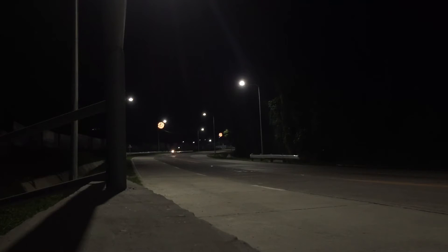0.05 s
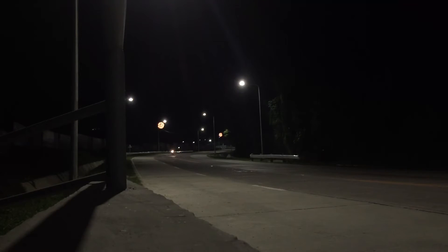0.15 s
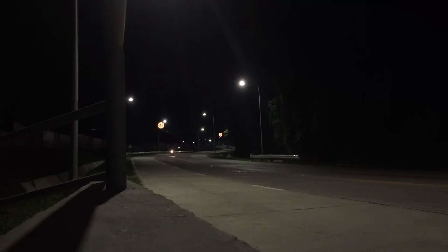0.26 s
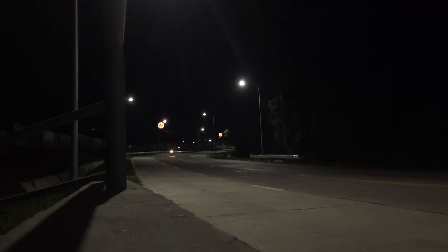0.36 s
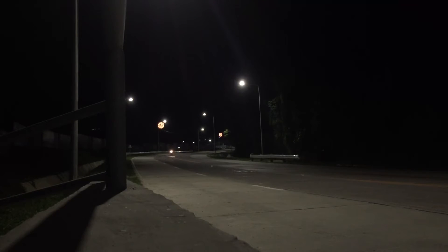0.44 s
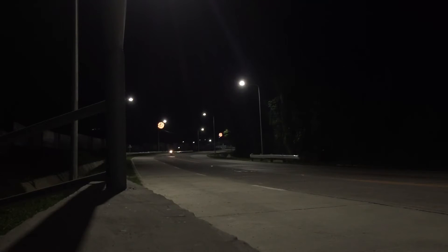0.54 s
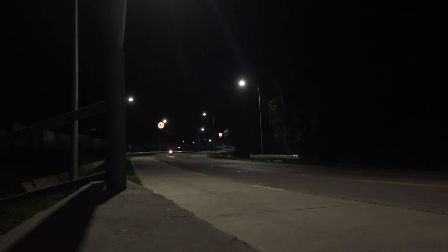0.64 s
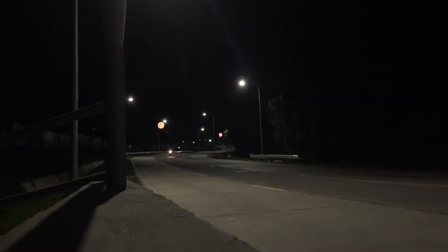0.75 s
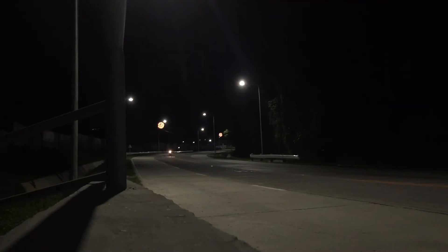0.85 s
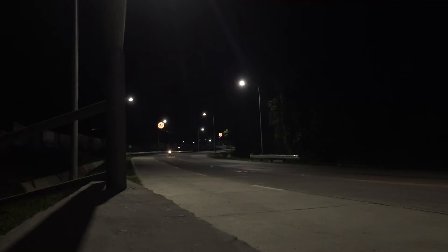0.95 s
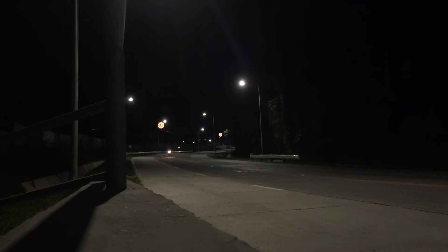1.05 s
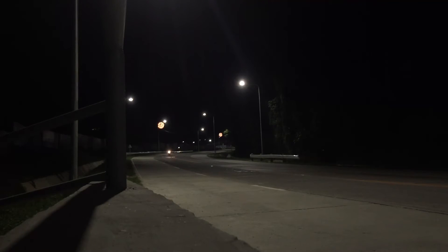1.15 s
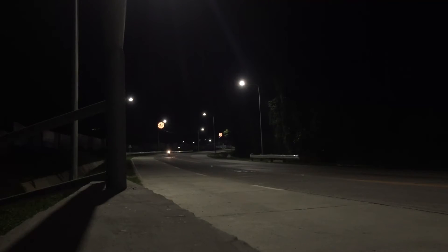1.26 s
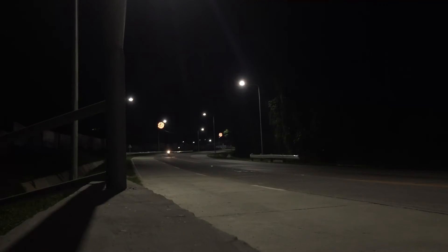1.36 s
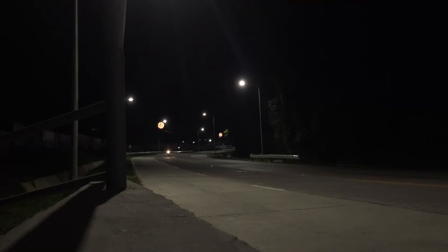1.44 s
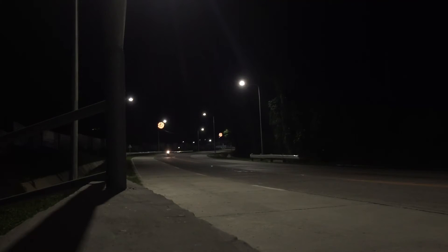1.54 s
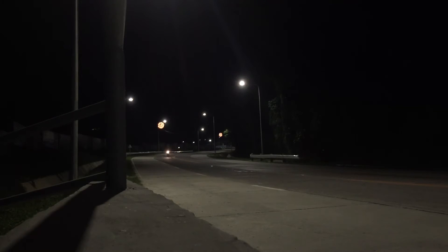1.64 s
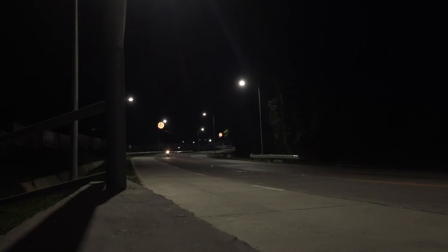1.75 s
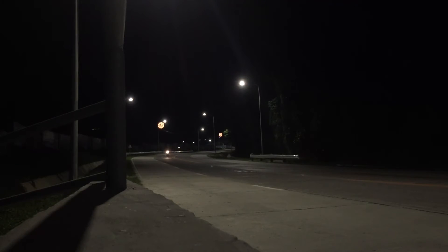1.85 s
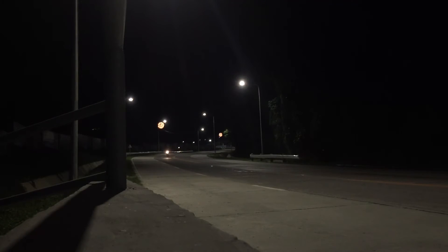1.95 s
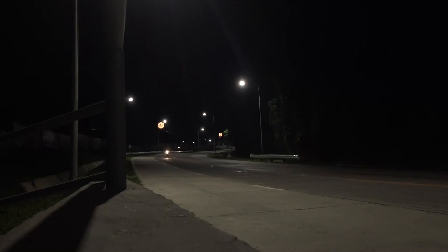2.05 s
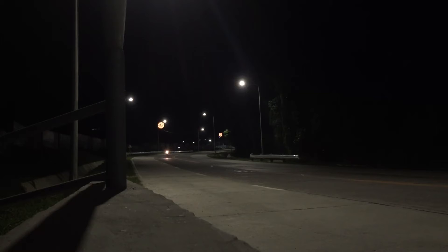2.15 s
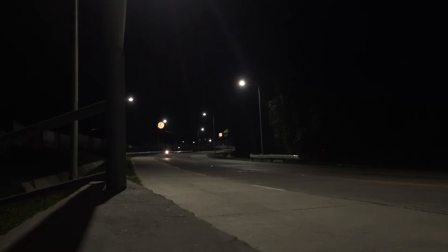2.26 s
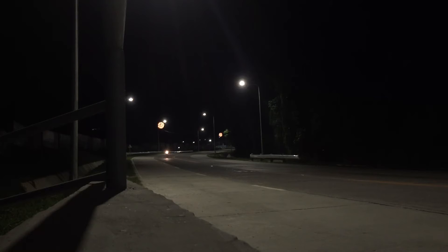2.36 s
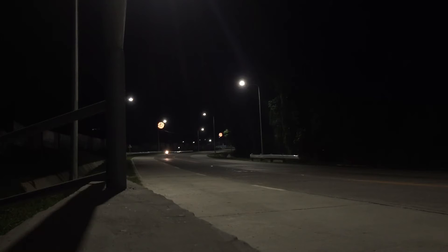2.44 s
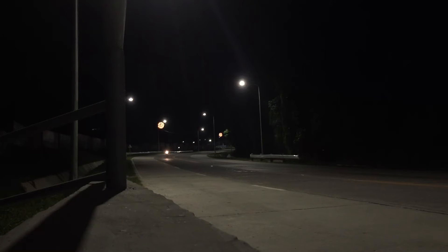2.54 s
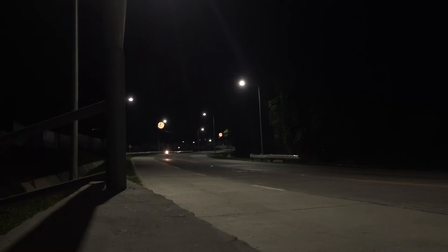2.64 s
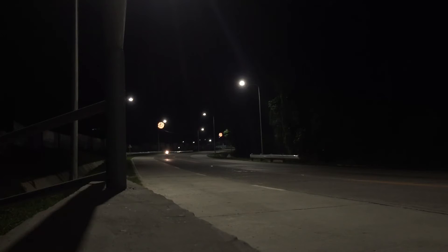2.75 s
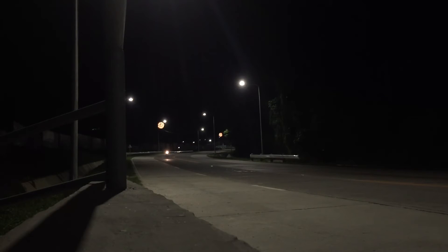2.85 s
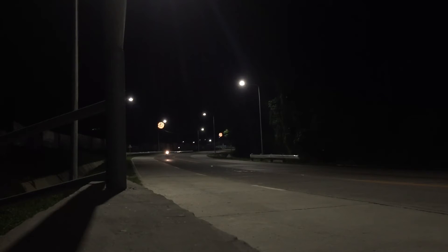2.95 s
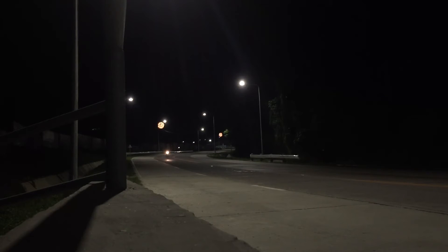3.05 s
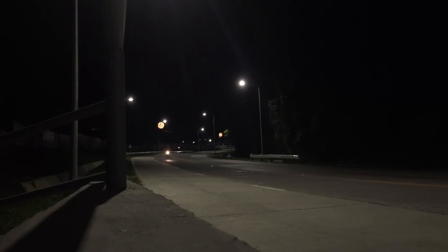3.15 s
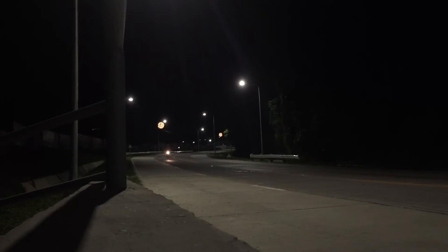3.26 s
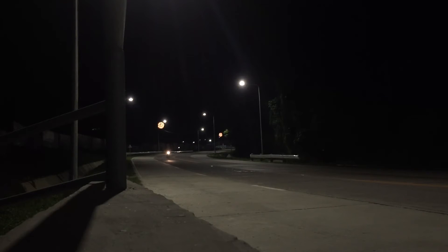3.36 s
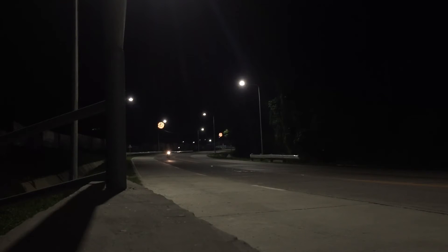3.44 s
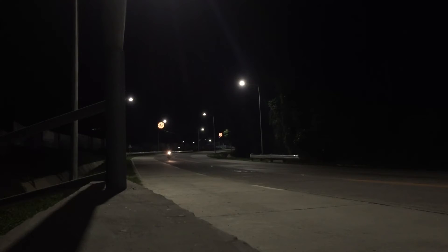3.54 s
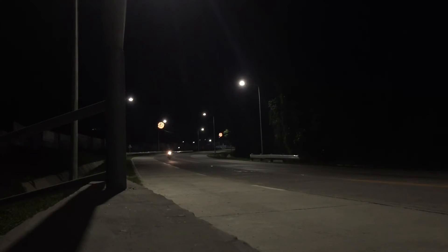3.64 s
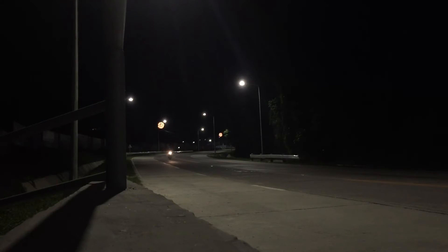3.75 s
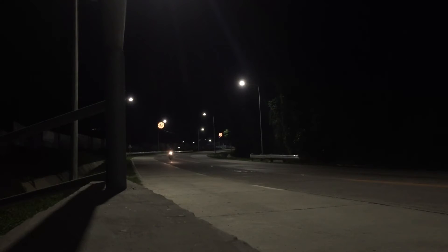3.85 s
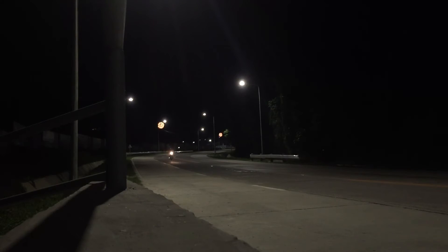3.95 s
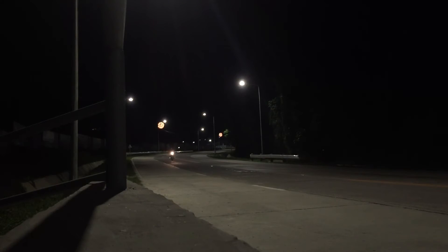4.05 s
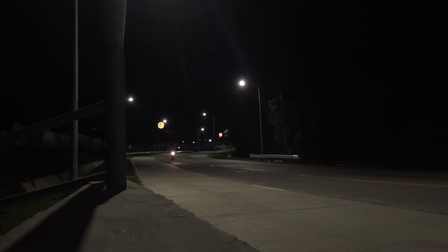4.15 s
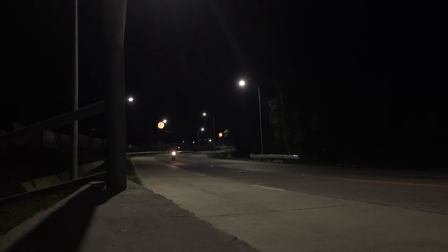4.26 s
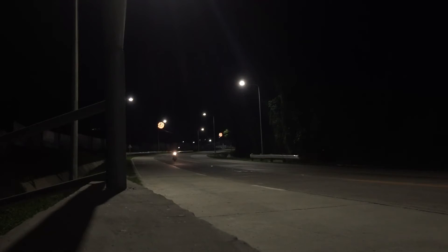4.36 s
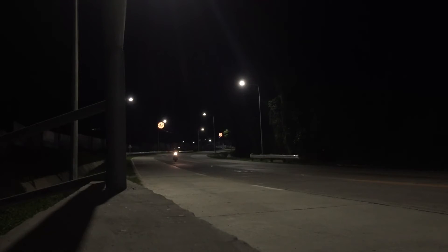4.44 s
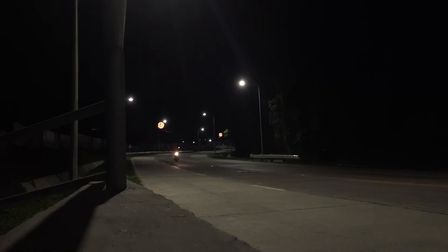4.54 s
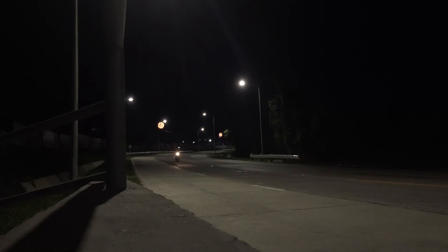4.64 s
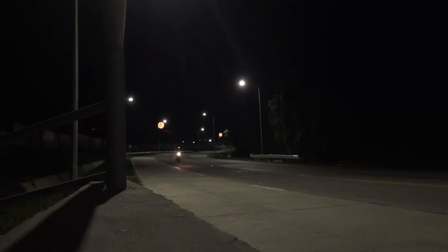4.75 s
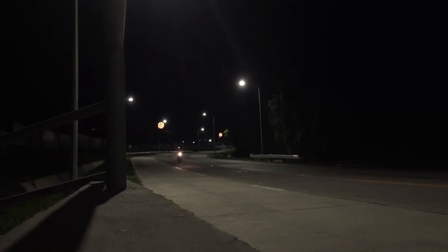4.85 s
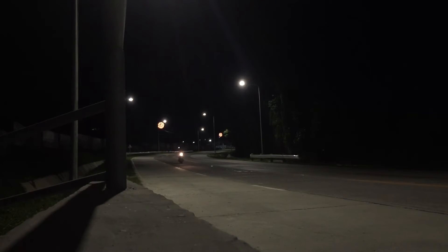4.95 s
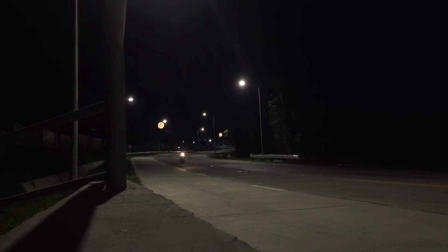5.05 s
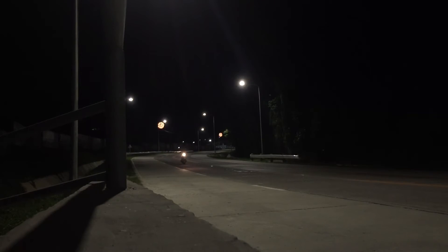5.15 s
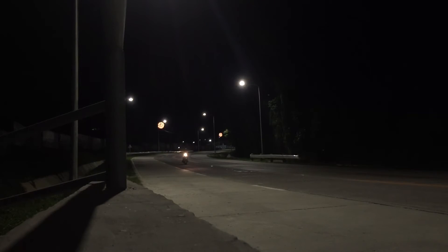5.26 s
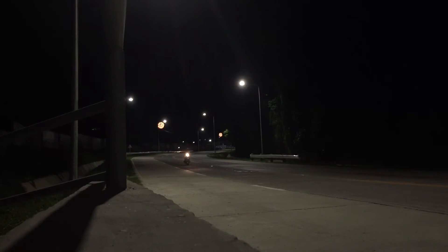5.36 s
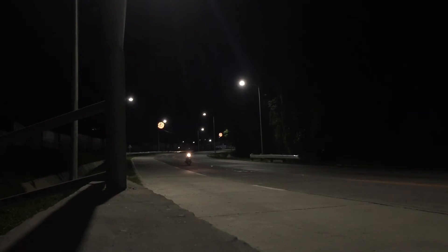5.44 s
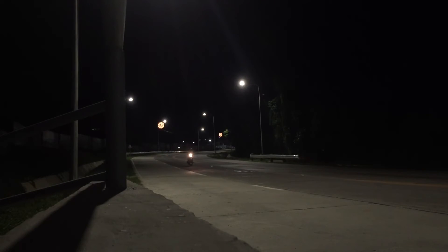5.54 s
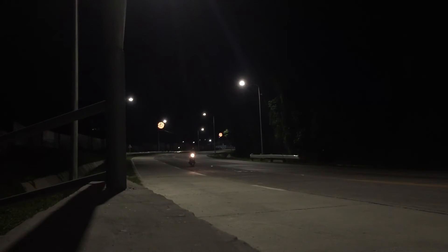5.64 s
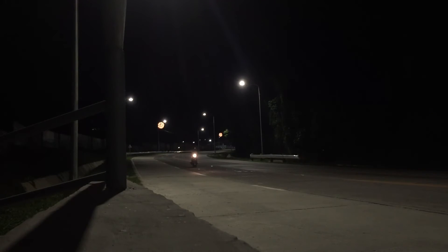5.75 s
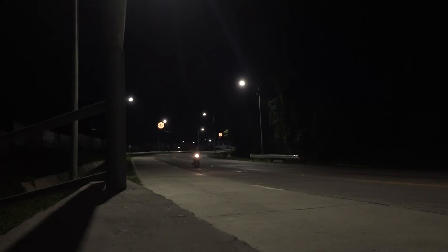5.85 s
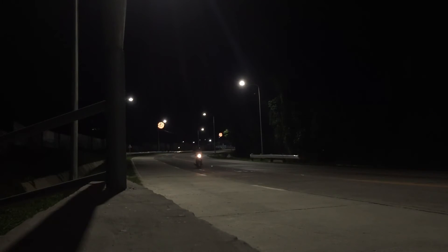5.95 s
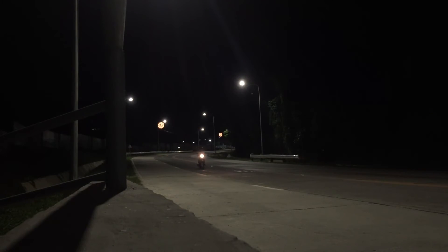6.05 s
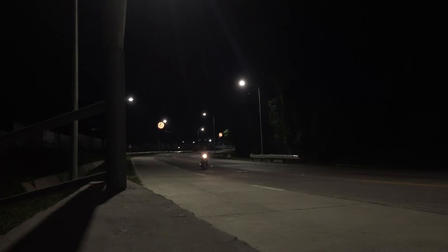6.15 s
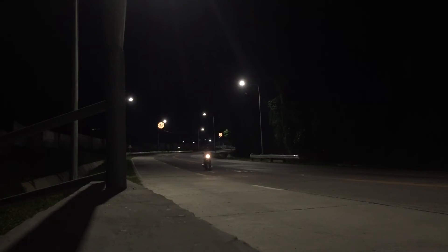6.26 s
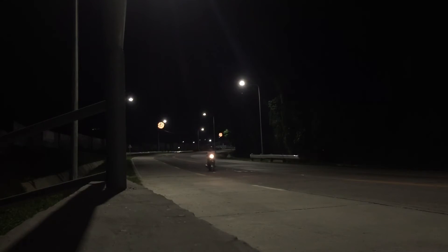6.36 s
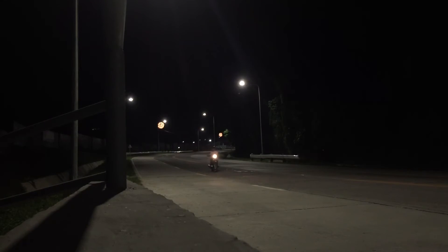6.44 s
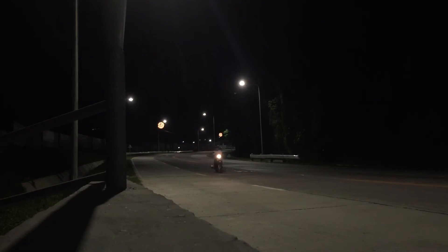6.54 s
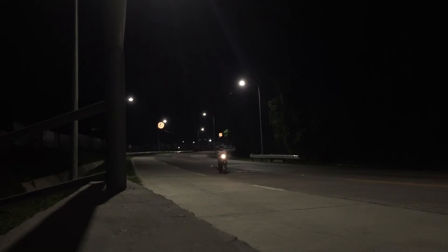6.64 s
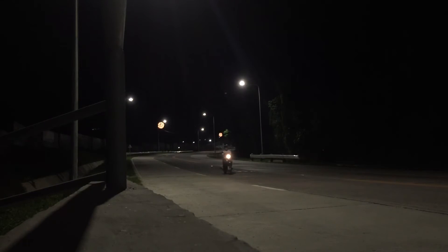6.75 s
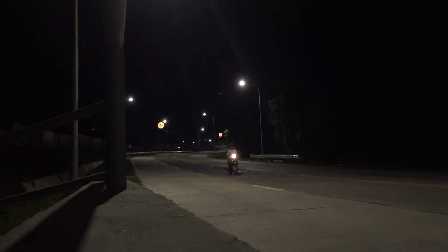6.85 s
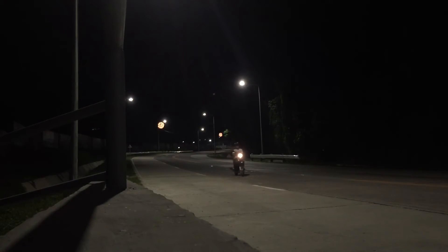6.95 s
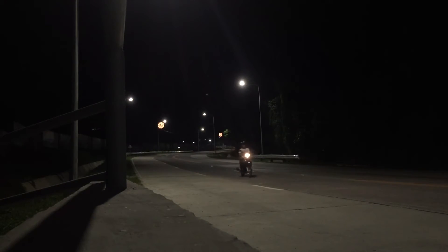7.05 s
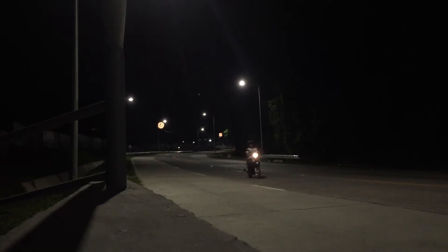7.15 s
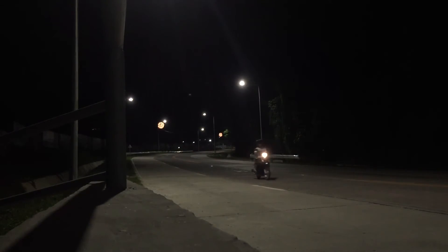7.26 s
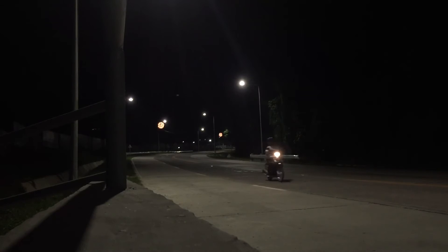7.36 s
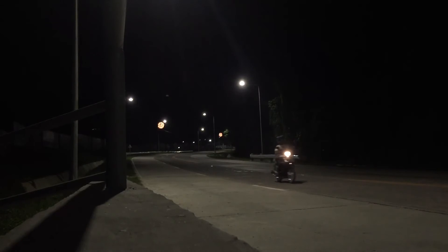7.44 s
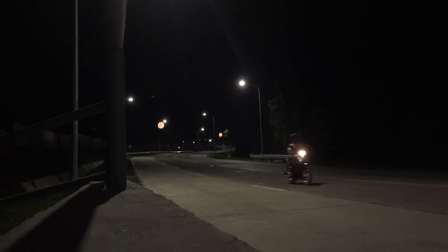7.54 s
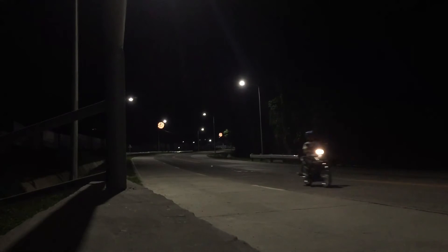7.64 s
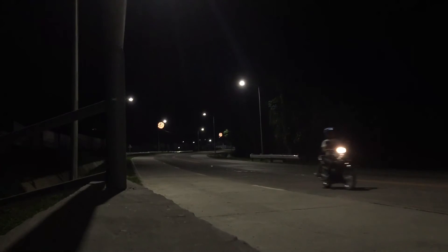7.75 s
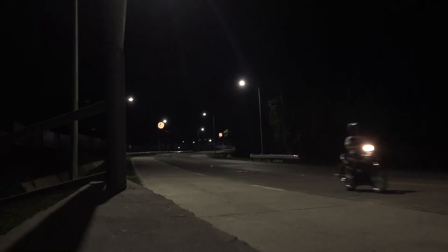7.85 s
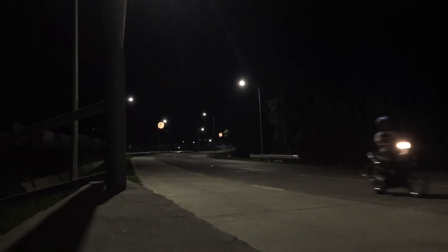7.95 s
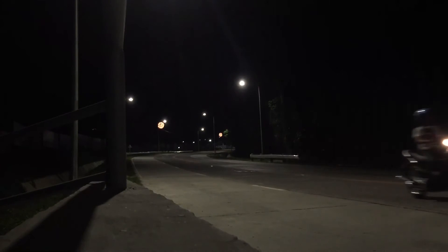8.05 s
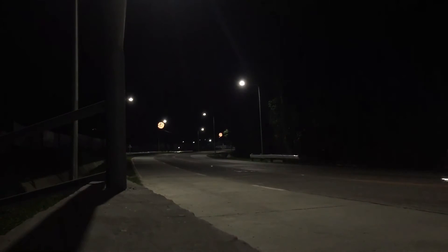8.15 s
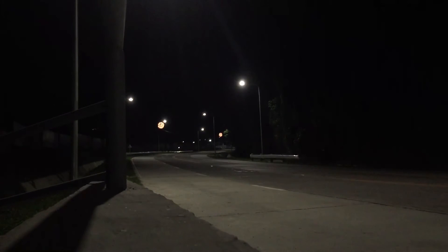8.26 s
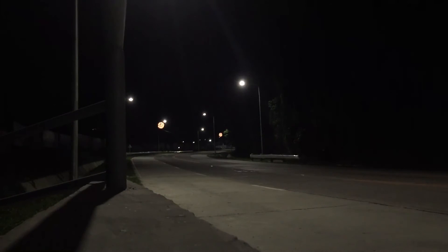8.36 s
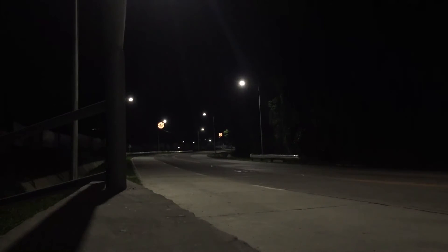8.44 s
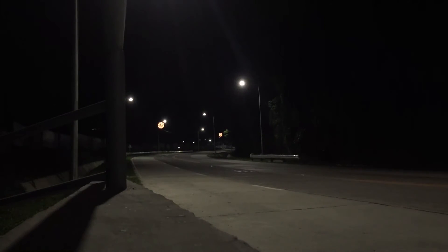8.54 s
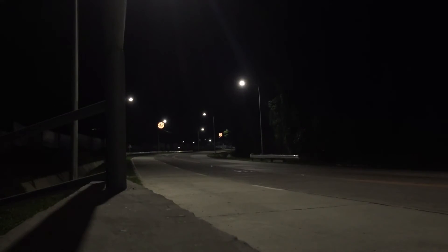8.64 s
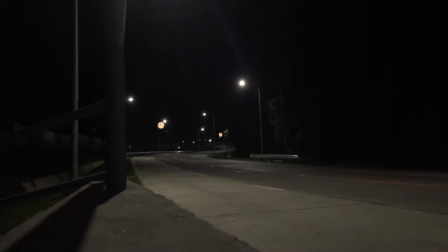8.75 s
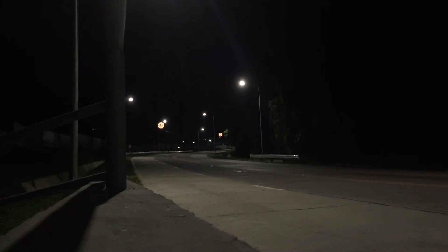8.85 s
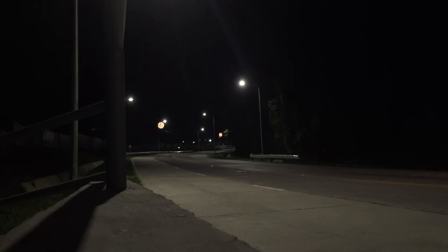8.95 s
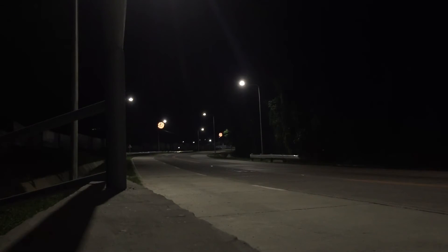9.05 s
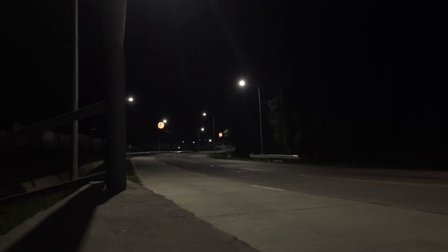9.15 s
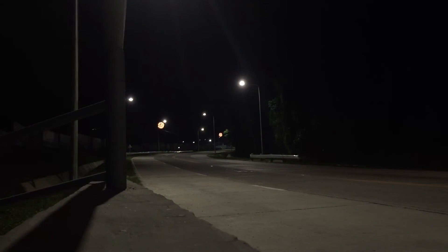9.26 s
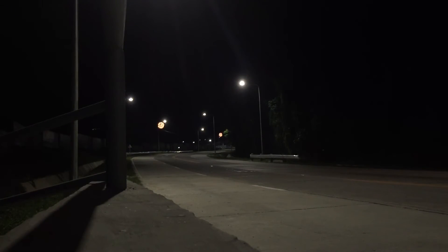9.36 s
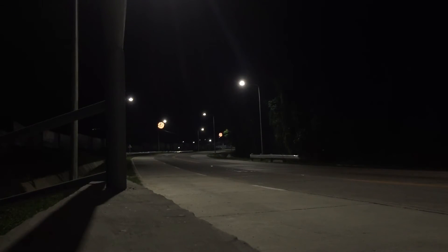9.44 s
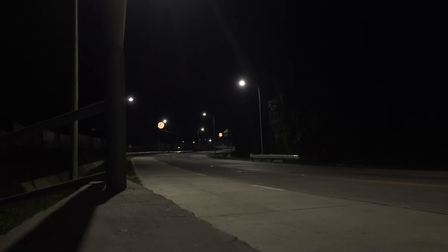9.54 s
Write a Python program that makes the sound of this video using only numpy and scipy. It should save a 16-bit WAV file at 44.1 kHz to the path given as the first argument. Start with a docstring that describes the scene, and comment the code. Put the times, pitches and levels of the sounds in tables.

```python
"""V-twin pass-by at night

A V-twin motorcycle with an open exhaust idles, pulls through two gears, coasts, opens up beside the listener
and shuts its throttle. Uneven firing pulses ring two pipes; shaped noise makes gas rasp, tyre roar and hiss.
Gear tones and resonances flare close by; echoes come off kerb, fence and trees.
Insects (scraped resonances), a frog (throbbing tone), ticks and a distant town's noise lie behind."""
import sys
import numpy as np
from scipy import signal
from scipy.fft import rfft, irfft
from scipy.io import wavfile
from scipy.ndimage import uniform_filter1d

SR = 44100
rng = np.random.default_rng(int(sys.argv[2]) if len(sys.argv) > 2 else 0)


def store_wav(level_fs):
    """Save 16-bit WAV to argv[1]."""
    pcm = np.round(np.clip(np.atleast_2d(level_fs), -1, 1) * 32767)
    wavfile.write(sys.argv[1], SR, pcm.T.astype(np.int16))


N = 423360
TIME = np.arange(N) / SR
PASS_S, PACE_M_PER_S, KERB_M = 8.6, 11.95, 6.65  # closest time, speed, closest distance
SOUND_M_PER_S = 343

# sharp front of a hard firing: [f/Hz, relative level/dB]
CRACK_COLOUR = [(100, -36.5), (300, -7.5), (480, -0.5), (650, -2.5), (820, 1), (1000, -17), (1250, -2.5),
                (1700, -24), (4000, -53)]
# gear whine, bent down during the pass: [t/s, f/Hz]
WHINE_HZ = [(4.2, 775), (5.3, 778), (6.5, 787), (8.1, 758), (8.4, 736.4), (8.7, 701), (9.1, 666.5)]


def amp(db):
    """Decibels to gain."""
    return 10 ** (np.asarray(db) / 20)


def unit(x):
    """Scales to rms 1."""
    return x / np.sqrt(np.mean(x ** 2) + 1e-20)


def curve(rows, axis=1):
    """One column of a time table, linear between rows, at every sample."""
    rows = np.asarray(rows)
    return np.interp(TIME, rows[:, 0], rows[:, axis])


def read(points, hz):
    """A spectrum table interpolated on a log-frequency axis."""
    f, value = np.transpose(points)
    return np.interp(np.log(hz + 1), np.log(f), value)


def noise(colour):
    """Gaussian noise of rms 1 with the given spectrum."""
    gain = amp(read(colour, np.fft.rfftfreq(N, 1 / SR)))
    return unit(irfft(rfft(rng.standard_normal(N)) * gain, N))


def drift(hz):
    """Slow random motion of rms 1: noise under a Gaussian low-pass."""
    gain = np.exp(-(np.fft.rfftfreq(N, 1 / SR) / hz) ** 2)
    return unit(irfft(rfft(rng.standard_normal(N)) * gain, N))


def resonate(x, hz, width_hz):
    """One-pole resonance of gain 1, fixed or moving: shift to 0 Hz, low-pass, shift back."""
    turn = np.exp(2j * np.pi * np.cumsum(hz * np.ones(len(x))) / SR)
    r = np.exp(-np.pi * width_hz / SR)
    return 2 * (turn * signal.lfilter([1 - r], [1, -r], x / turn + 1e-18)).real


def ring(x, colour, size=16384):
    """Passes x through a causal, minimum-phase body of energy 1 with the given spectrum."""
    log_gain = np.log(amp(read(colour, abs(np.fft.fftfreq(size, 1 / SR)))))
    response = np.fft.ifft(np.exp(np.conj(signal.hilbert(log_gain)))).real[:size // 2]
    return signal.oaconvolve(x, response / np.linalg.norm(response))[:N]


def clicks(turns):
    """One click at every whole turn."""
    return np.diff(np.floor(turns), prepend=np.floor(turns[0]))


def distance():
    """Metres from bike to listener on a straight ride at constant speed."""
    return np.hypot(KERB_M, PACE_M_PER_S * (TIME - PASS_S))


def behind():
    """0 on approach, then rising towards 1 as the pipe turns to face the listener."""
    return np.maximum(PACE_M_PER_S * (TIME - PASS_S) / distance(), 0)


def carried(fall):
    """Gain along the ride; fall: (closest/dB, loss per decade/dB, loss per metre/dB, gain from behind/dB)."""
    near_db, spread_db, air_db, behind_db = fall
    spread_loss_db = spread_db * np.log10(distance() / KERB_M)
    air_loss_db = air_db * (distance() - KERB_M)
    return amp(near_db - spread_loss_db - air_loss_db + behind_db * behind())


def grip():
    """Throttle 0-1: each twist opens, holds and snaps shut; the widest one counts."""
    # twists: [open t/s, shut t/s, opening 0-1, full-travel time/s]
    pull_rows = [(-.1, 1.9, .38, .05), (1.27, 2.92, .97, .7), (3.29, 4.96, .97, .13), (7.3, 7.95, .22, .45),
                 (7.89, 9.265, .95, .08)]
    shut_s, coast_throttle = 0.077, 0.018
    twists = []
    for start, end, opening, rise_s in pull_rows:
        ramp = np.minimum((TIME - start) / rise_s, 1 - (TIME - end) / shut_s)
        twists.append(opening * np.clip(ramp, 0, 1))
    return np.clip(np.maximum(np.max(twists, axis=0), coast_throttle), 0, 1)


def firings(turns, gap, rear_db, spread_db):
    """Two cylinders fire unevenly, short gap then long; each burn differs a little in strength."""
    front = clicks(turns)
    rear = amp(rear_db) * clicks(turns - gap)
    return np.array([front, rear]) * amp(spread_db * rng.standard_normal((2, N)))


def pipes(pulses, colour):
    """Each cylinder rings its own pipe."""
    hz, front_db, rear_db = np.transpose(colour)
    return ring(pulses[0], np.c_[hz, front_db]) + ring(pulses[1], np.c_[hz, rear_db])


def exhaust(drone_hz=314, drone_width_hz=26, drone_db=2, crackle_db=1.3, puff_s=0.0084, lug_db=3,
            burble_below=0.66, burble_slope_db=1.54):
    """Firings ring the pipes: deep boom when coasting, sharp bark and puffs of gas under load."""
    # engine: [t/s, cycles/s]; each cylinder fires once a cycle
    speed_rows = [(0, 17.4), (.53, 14.58), (.69, 15.28), (1.46, 15.59), (1.84, 18.09), (2.46, 24.37),
                  (2.94, 30.29), (3.3, 20.18), (3.9, 23.03), (4.99, 29.58), (5.08, 28.1), (5.24, 28.82),
                  (7.9, 20.68), (8.34, 21.64), (9.19, 24.84), (9.46, 22.75), (9.6, 25)]
    # rear against front cylinder, rows bark, boom, burble: [lag/cycles, level/dB]
    rear_rows = [(.374, 2), (.368, 3.9), (.356, 3.2)]
    # pulse, throttle open / shut / wheel driving engine: [f/Hz, front pipe level/dB, rear pipe level/dB]
    bark_colour, boom_colour, burble_colour = [(25.0, -94.0, -63), (44.8, -14, -27.5), (64.5, -8, -38.6),
                                               (82.4, 0.3, -3), (115.8, 3.5, 2.5), (145.7, -1.5, -4.5),
                                               (171, -2.5, -5.0), (200.0, -1, -2.5), (238, -14, -12),
                                               (273, -10, -10), (309.6, -14.9, -7.5), (378, -17.5, -20),
                                               (449, -25.5, -22.5), (556, -39, -33), (750.0, -50.0, -34.5),
                                               (1300.0, -50.5, -51.0), (4000.0, -81, -85.4)], [(25.2, -72.9, -63), (45.0, -29, -26.5),
                                                             (58.2, 0, -10.5), (69.9, 3.5, 7),
                                                             (84.2, 9, 0.4), (105.5, -6.5, -11.5),
                                                             (135.0, -7, -8.6), (166, -4.3, -11),
                                                             (216, -15, -15.5), (273, -36, -28.5),
                                                             (420.0, -41, -45.4), (650.0, -53, -51),
                                                             (1100.0, -75.9, -70), (4000.0, -89.6, -87)], [(40.0, -54, -61.0),
                                                                           (100.0, -22, -33.4),
                                                                           (172.0, 0.6, -14.7),
                                                                           (214, -3, -16.8), (247, -1, 2.5),
                                                                           (311, 10.8, 1.5),
                                                                           (364, 1.6, 0.3),
                                                                           (410.0, -13.1, -3.5),
                                                                           (470.0, -12, -4.5),
                                                                           (597, -15, -6),
                                                                           (780.0, -26, -13.5),
                                                                           (1000.0, -34.9, -30.2),
                                                                           (4000.0, -67.1, -61.7)]
    # turbulent gas leaving the pipe: [f/Hz, relative level/dB]
    rasp_colour = [(30, -46), (60, -11), (120, 9), (200, -5.5), (350, 0), (550, -10.5), (900, -12.5),
                   (1500, -20), (3000, -44), (8000, -56)]
    # level swells and dips: [t/s, 1/e half width/s, level/dB]
    swell_rows = [(.1, 0.28, 2.5), (2.75, 0.27, 1.5), (3.27, 0.044, -3), (5.731, 0.04, -2),
                  (6.05, 0.076, -2.5), (6.8, .12, -1.5), (7.3, .25, -1), (8.08, 0.018, -12)]
    # [closest/dB, loss per decade of distance/dB, loss per metre/dB, gain from behind/dB]
    bark_fall, boom_fall, burble_fall = (-18.5, -0.77, 0.1327, 0.9), (-16.5, 10, 0.0255, 0.5), (-32.5, -.9, 0.14, -4)
    rasp_fall, crack_fall = (-34, 5, 0.06, 2.5), (-49, 0.5, 0.1, -4)

    speed, throttle = curve(speed_rows), grip()
    start_turn, wobble_turns, coast_rasp = .19, .0008, .2
    spread_db = .2 + .35 * throttle
    turns = start_turn + np.cumsum(speed) / SR + wobble_turns * drift(30)
    # weaker per pulse at higher revs
    pulses, thuds, gulps = [firings(turns, gap, rear_db, spread_db) * np.sqrt(SR / speed / 2)
                            for gap, rear_db in rear_rows]
    bark = -pipes(pulses * np.sin(throttle * np.pi / 2), bark_colour)
    boom = pipes(thuds * (1 - throttle), boom_colour)
    # throttle nearly shut: burble, fading as revs sink
    overrun = np.clip(1 - throttle / burble_below, 0, 1) * amp(burble_slope_db * (speed - 28.5))
    burble = pipes(gulps * overrun, burble_colour)
    # high revs: a pipe mode sings out
    revving = np.clip((speed - 25.5) / 2, 0, 1)
    drone = amp(drone_db) * resonate(bark * revving, drone_hz, drone_width_hz)
    # wide throttle at low revs puffs hardest
    lugging = throttle ** 2 * np.clip((25 - speed) / 4, 0, 1)
    both = pulses.sum(0)
    puffs = unit(signal.lfilter([1], [1, -np.exp(-1 / (puff_s * SR))], both))
    gas = (coast_rasp + throttle ** 2) * amp(lug_db * lugging) * puffs * rng.standard_normal(N)
    rasp = ring(gas, rasp_colour)
    # sharp fronts of varying strength under load, most at low revs
    hardness = throttle ** 3 * np.clip((28 - speed) / 5, .3, 1)
    scatter = amp(crackle_db * np.clip(rng.standard_normal(N), -2, 2))
    crackle = ring(both * hardness * scatter, CRACK_COLOUR)
    swells = amp(sum(db * np.exp(-((TIME - s) / width_s) ** 2) for s, width_s, db in swell_rows))
    tonal = carried(bark_fall) * (bark + drone) + carried(boom_fall) * boom + carried(burble_fall) * burble
    return swells * (tonal + carried(rasp_fall) * rasp + carried(crack_fall) * crackle)


def pops():
    """Late burns of unburnt fuel thud in the pipe at low speed: short decaying sines."""
    # [t/s, envelope peak/dB, f/Hz, ring time/s]
    pop_rows = [(.343, -14, 79.7, 0.011), (0.434, -21, 71.4, 0.0064), (0.508, -28, 52, 0.036),
                (0.57, -20, 85.5, 0.0039), (1.241, -35, 46, 0.032)]
    out = np.zeros(N)
    for s, db, hz, ring_s in pop_rows:
        age = np.maximum(TIME - s, 0)
        envelope = age / ring_s * np.exp(1 - age / ring_s)
        out += amp(db) * envelope * np.sin(2 * np.pi * hz * age)
    return out


def cracks():
    """Single hard burns, at gear changes and as the throttle bites: impulses through the crack body."""
    # [t/s, strength/dB]
    crack_rows = [(3.118, -27), (3.296, -17), (3.459, -14), (3.507, -24), (3.555, -14.5), (3.619, -23),
                  (3.664, -13), (3.799, -15), (4.016, -17), (4.141, -24), (5.768, -12), (8.171, -2),
                  (8.801, -5), (9.477, -11)]
    kicks = np.zeros(N)
    for s, db in crack_rows:
        kicks[round(s * SR)] = amp(db)
    return ring(kicks, CRACK_COLOUR)


def gears(reach_s=0.79, waver=0.0048):
    """One gear whines, later with a lower partner; others join close by, and all bend in pitch together."""
    # gear and chain tones heard close by: [multiple of the whine, mean level/dB]
    gear_rows = [(1.11, -5), (1.48, -6), (1.61, -2.5), (1.83, -5)]
    turns = np.cumsum(curve(WHINE_HZ) * (1 + waver * drift(26.5))) / SR
    main = amp(2 * drift(6.5)) * np.sin(2 * np.pi * turns)
    joining = np.clip((TIME - 5.8) / 0.73, 0, 1)
    partner = amp(-5.5 + 3 * drift(2.7)) * joining * np.sin(2 * np.pi * .945 * turns)
    others = sum(amp(db + 2.6 * drift(4)) * np.sin(2 * np.pi * multiple * turns)
                 for multiple, db in gear_rows)
    close = np.exp(-((TIME - PASS_S) / reach_s) ** 2)
    return main + partner + close * others


def rolling(hiss_db=8.0, height_product_m2=0.462, bounce=0.15, flutter_db=1.36, load_db=-0.5):
    """Tyre, chain and gear sound; a road reflection sweeps a comb through the noise during the pass."""
    # tyre roar, chain hiss, valve gear and chain: [f/Hz, relative level/dB]
    roar_colour, hiss_colour, rattle_colour = [(40, 0.5), (200, 4.5), (550, -3), (800, -2.5), (1200, 0),
                                               (2200, -4.5), (3000, -9.5), (4000, -13.5), (5000, -19.5),
                                               (7500, -28), (15000, -40)], [(800, -8), (2300, 7), (3500, -5),
                                                                    (6000, 15), (7500, 6.5), (10000, 5),
                                                                    (13000, 1.5), (16000, 2)], [(800, -13),
                                                                                         (1800, 2.5),
                                                                                         (2600, -6),
                                                                                         (3800, -5.5),
                                                                                         (5000, -14.5),
                                                                                         (8000, -25),
                                                                                         (15000, -40)]
    # treble during the pass: [t/s, level before hiss_db/dB]
    hiss_rows = [(5.5, -90), (7.4, -95), (7.7, -64), (8.1, -61.5), (8.7, -49.5), (8.95, -63.5), (9.25, -70),
                 (9.6, -65)]
    # [closest/dB, loss per decade of distance/dB, loss per metre/dB, gain from behind/dB]
    roar_fall, rattle_fall, whine_fall = (-32.5, 8.5, 0.25, -5), (-43.5, 0, 0.6, -5.5), (-43.5, 3.5, 0.3, -4.5)

    rush = carried(roar_fall) * amp(flutter_db * drift(60)) * noise(roar_colour)
    rush += carried(rattle_fall) * amp(load_db * grip() + flutter_db * drift(70)) * noise(rattle_colour)
    near = np.clip((TIME - 5.5) / 2, 0, 1)
    rush += near * amp(curve(hiss_rows) + hiss_db + flutter_db * drift(90)) * noise(hiss_colour)
    bounce_delay_s = 2 * height_product_m2 / distance() / SOUND_M_PER_S
    rush += bounce * np.interp(TIME - bounce_delay_s, TIME, rush)
    emerging = np.clip((TIME - 3.8) / 0.72, 0, 1)
    return rush + emerging * carried(whine_fall) * gears()


def flares():
    """Running-gear resonances, and a brief rush near 2.3 kHz at 7.7 s, swell and fade as the bike turns past,
    bent by the root of the whine's ratio."""
    # [peak t/s, 1/e half width/s, f at unit bend/Hz, width/Hz, level before fading/dB]
    flare_rows = [(7.68, .09, 2330, 700, -40), (8.0, .17, 2180, 500, -40.5), (7.95, .2, 1350, 500, -44),
                  (8.55, .2, 2160, 330, -38), (8.52, .15, 4150, 700, -48), (8.55, .15, 1210, 260, -42.5),
                  (8.95, .18, 3400, 220, -52), (9.15, .3, 1250, 340, -42.5), (9.6, .12, 3800, 1500, -49)]
    bend = curve(WHINE_HZ) / np.interp(PASS_S, TIME, curve(WHINE_HZ))
    out = np.zeros(N)
    for s, half_s, hz, width_hz, db in flare_rows:
        near = abs(TIME - s) < 2.5 * half_s
        bent_hz = hz * np.sqrt(bend[near])
        tone = rng.standard_normal(N)[near]
        for _ in range(2):
            tone = resonate(tone, bent_hz, width_hz)
        out[near] += amp(db) * unit(tone) * np.exp(-((TIME[near] - s) / half_s) ** 2)
    return out


def early(x):
    """Near reflections off kerb, rail and fence fill the gaps between firings."""
    # [delay/s, level/dB]
    early_rows = [(.0078, -16.5), (0.0132, -18.5), (0.0245, -18)]
    return sum(amp(db) * np.interp(TIME - delay_s, TIME, x) for delay_s, db in early_rows)


def fence(x, setback_m=2.6, reach_m=10):
    """Echo from a fence behind the listener: its delay grows and shrinks, sweeping a comb through x."""
    bounce_db = -18
    along_m = PACE_M_PER_S * (TIME - PASS_S)
    delay_s = (np.hypot(KERB_M + 2 * setback_m, along_m) - distance()) / SOUND_M_PER_S
    return amp(bounce_db) * np.exp(-(along_m / reach_m) ** 2) * np.interp(TIME - delay_s, TIME, x)


def street(x):
    """Scattered echoes from trees and fences: sparse random taps, treble decaying fastest."""
    # reverberation: [f/Hz, t60/s]
    decay_rows = [(60, 1), (300, 0.75), (2000, 0.19), (8000, 0.1)]
    taps = rng.standard_normal(SR) * (rng.random(SR) < 2000 / SR) * (TIME[:SR] > .02)
    hz, t, z = signal.stft(taps, SR, nperseg=512)
    decay = amp(-60 * t / read(decay_rows, hz)[:, None])
    tail = signal.istft(z * decay, SR, nperseg=512)[1]
    return signal.oaconvolve(x, tail / np.linalg.norm(tail))[:N]


def insects():
    """Wing strokes scrape a narrow resonance, in chirps."""
    # [start t/s, end t/s, f/Hz, width/Hz, level/dB, chirps/s, chirp t/s, chirp depth 0-1,
    #  wing strokes/s, noisiness 0-1]
    insect_rows = [(0, 9.6, 5860, 820, -56.5, 3.435, 0.0017, 0.37, 70, 1),
                   (0, 11, 8450, 640, -71.5, 6.9, 0.064, 0.37, 110, 0.4),
                   (3.599, 7.4, 8460, 290, -71, 9.9, 0.056, 0.6, 110, 0.35),
                   (0, 2.64, 7740, 900, -72.5, 8.4, 0.032, 0.4, 90, 1),
                   (0, 8.8, 9920, 1100, -73.5, 0.5, 1.5, 0, 160, 0.4),
                   (0, 8.1, 11150, 1300, -73, 0.13, 0.46, 0.44, 158, 0.4),
                   (.65, 1.75, 4040, 700, -72.5, 1.2, 1, .3, 60, .9),
                   (2.45, 3.85, 3960, 1100, -68.5, 1, 2.83, .4, 60, .9),
                   (0.5, 3.2, 3110, 390, -69.5, 5.5, 0.904, 0.47, 60, 0.8)]
    out = np.zeros(N)
    for start, end, hz, width_hz, db, chirp_hz, chirp_s, depth, stroke_hz, noisy in insect_rows:
        turns = np.cumsum(stroke_hz * (1 + 0.00087 * drift(4.4))) / SR
        scrape = unit(rng.standard_normal(N) * (1 + (1 - noisy) * np.cos(2 * np.pi * turns)))
        song = (1 - noisy) * unit(clicks(turns)) + noisy * scrape
        for _ in range(4):
            song = resonate(song, hz, width_hz)
        chirp_phase = 2 * np.pi * chirp_hz * (TIME - chirp_s) + 0.067 * drift(1.8)
        chirps = 1 + depth * np.tanh(2 * np.cos(chirp_phase))
        out += amp(db) * unit(song * chirps) * ((TIME >= start) & (TIME < end))
    return out


def frog(hz=2470, throb_hz=18, fade_s=0.019):
    """Short throbbing trills on one clear, slightly hoarse note."""
    # [t/s, length/s, level before trim/dB]
    trill_rows = [(0.228, 0.35, -54.5), (1.288, 0.29, -54), (2.335, 0.38, -57.5), (3.522, 0.42, -56.5),
                  (4.68, 0.33, -55), (5.848, 0.41, -54.5)]
    waver, hoarse, trim_db = .011, .55, -0.5
    tone = np.sin(2 * np.pi * np.cumsum(hz * (1 + waver * drift(69.6))) / SR)
    voice = unit((1 + hoarse * drift(110)) * tone)
    throb = 1 + 0.52 * np.cos(2 * np.pi * throb_hz * TIME + 1.1 * drift(11.0))
    calls = sum(amp(db) * np.clip(np.minimum(TIME - s, s + length_s - TIME) / fade_s, 0, 1)
                for s, length_s, db in trill_rows)
    return amp(trim_db) * voice * throb * calls


def ticks(ring_s=0.0029, width_hz=380, trim_db=-0.5):
    """Brief dry ticks from the verge, each a burst of noise in one resonance."""
    # [t/s, level before trim/dB, f/Hz]
    tick_rows = [(.056, -44, 2150), (0.102, -44.5, 1690), (.29, -48, 1890), (.46, -41, 1710),
                 (.883, -45, 1810), (0.89, -52, 2930), (1.405, -38, 1900), (1.505, -50, 3100),
                 (1.605, -55.5, 5450), (1.72, -53, 5450), (2.559, -57, 2720), (2.581, -44.5, 1960),
                 (3.1, -44, 2200), (3.378, -40, 1820), (5.304, -54, 5430)]
    out, age = np.zeros(N), np.arange(2048) / SR
    envelope = age / ring_s * np.exp(1 - age / ring_s)
    for s, db, hz in tick_rows:
        burst = rng.standard_normal(len(age))
        for _ in range(2):
            burst = resonate(burst, hz, width_hz)
        out[round(s * SR):][:len(age)] += amp(db + trim_db) * unit(burst) * envelope
    return out


def patchy(x):
    """Makes a noise uneven: patches some 500 Hz wide and 70 ms long swell and sink."""
    depth_db = 3
    z = signal.stft(x, nperseg=512)[2]
    patches = uniform_filter1d(rng.standard_normal(z.shape), size=6, axis=0)
    patches = unit(uniform_filter1d(patches, size=12, axis=1))
    return unit(signal.istft(z * amp(depth_db * patches), nperseg=512)[1][:N])


def town(level_db=-50):
    """Distant town: steady coloured noise made patchy."""
    # [f/Hz, relative level/dB]
    night_colour = [(20, -3), (60, -18), (200, 8.5), (500, 6), (1000, 4), (2000, 2), (3000, -11.5),
                    (4000, -18), (4800, -21), (7000, -21.5), (12500, -19), (15500, -35)]
    return amp(level_db) * patchy(noise(night_colour))


def scene():
    """The bike, its echoes (trees and fences scatter little bass) and the night around it."""
    echo_db, echo_low_hz = -16.5, 170
    pipe = exhaust() + pops() + cracks()
    bike = pipe + early(pipe) + fence(pipe) + rolling() + flares()
    high_pass = signal.butter(2, echo_low_hz, "high", fs=SR, output="sos")
    echoes = signal.sosfilt(high_pass, street(bike))
    night = insects() + frog() + ticks() + town()
    return (bike + amp(echo_db) * echoes + night)[None]


def record(dry):
    """Upper band limit of the recorder: linear-phase low-pass."""
    edge_hz = 15700
    low_pass = signal.firwin(511, edge_hz, window=("kaiser", 9), fs=SR)
    return signal.oaconvolve(dry, low_pass[None], "same")


dry = scene()
out = record(dry)
store_wav(out)
```